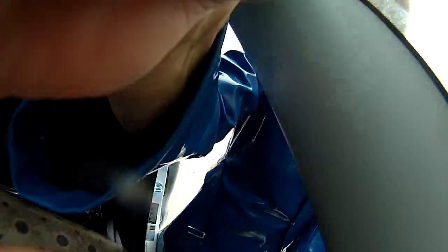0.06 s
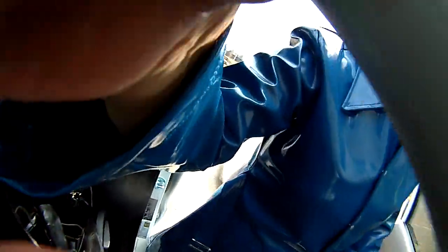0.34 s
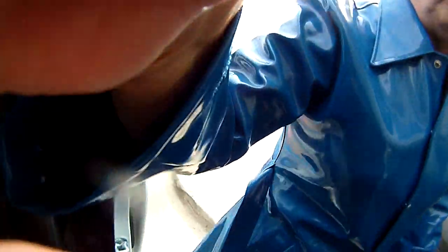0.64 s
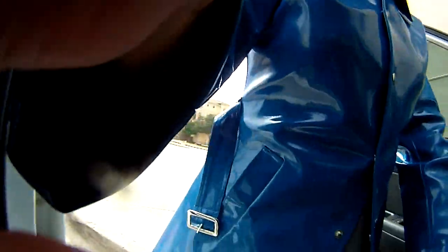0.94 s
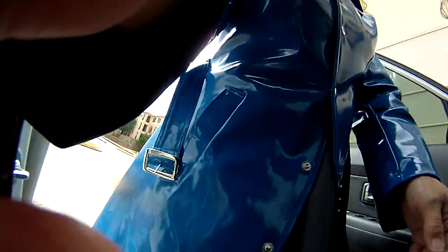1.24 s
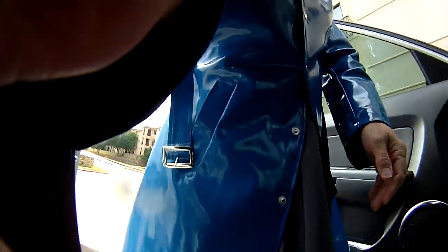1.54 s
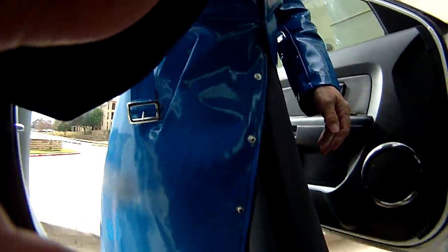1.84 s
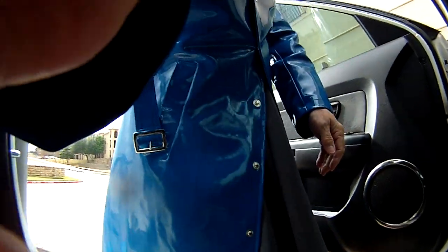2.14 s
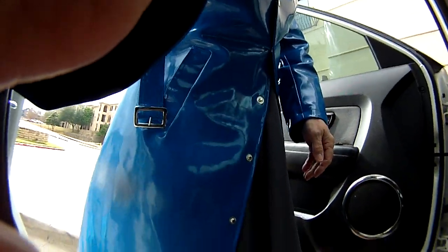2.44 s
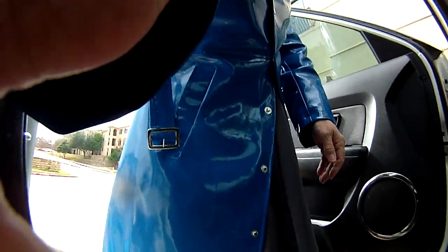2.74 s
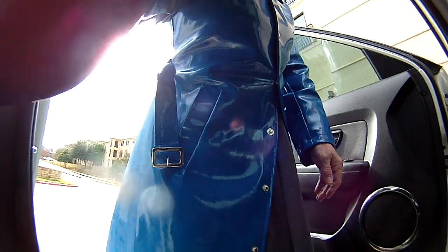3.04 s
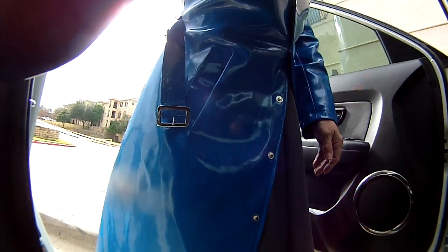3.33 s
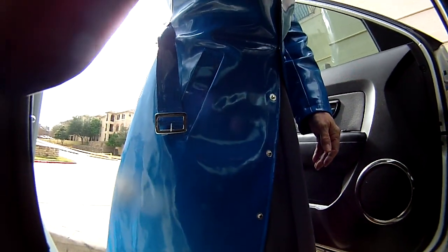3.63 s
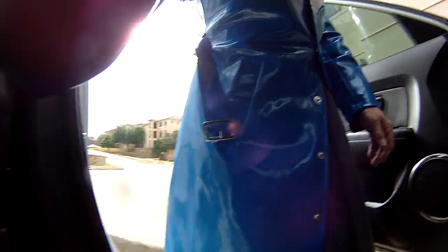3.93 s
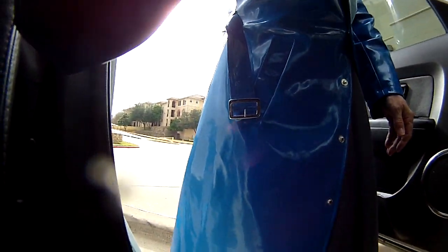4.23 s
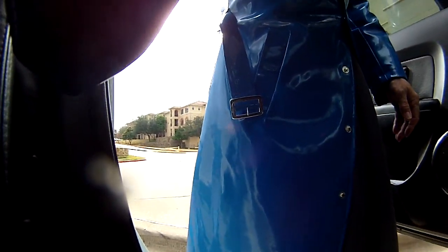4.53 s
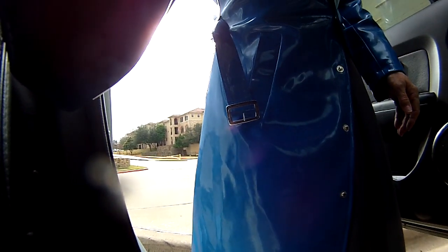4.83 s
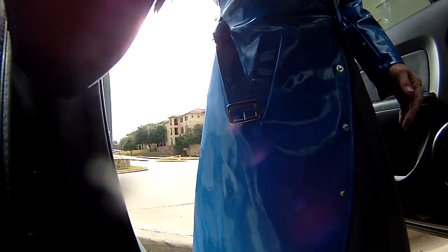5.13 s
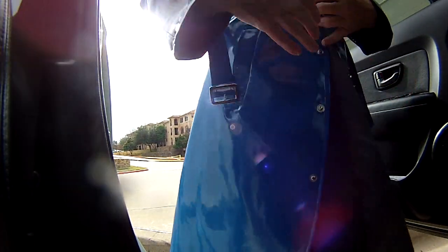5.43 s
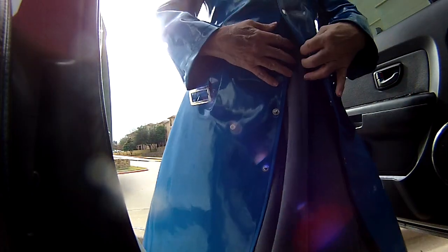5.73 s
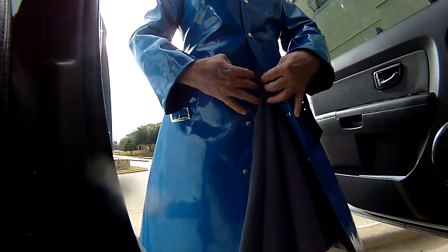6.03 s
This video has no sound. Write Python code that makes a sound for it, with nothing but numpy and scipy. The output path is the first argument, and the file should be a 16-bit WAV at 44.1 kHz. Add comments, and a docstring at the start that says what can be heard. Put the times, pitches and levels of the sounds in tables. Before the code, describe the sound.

A low rumble of distant traffic runs throughout, outdoors. From about 0.2 to 1.3 seconds a glossy plastic coat crinkles softly, with an uneven run of tiny snaps as the arms move. From 1.6 to 4.9 seconds a hand shifts its grip on the camera, right at the microphone. Skin slides over the plastic casing in many short strokes, some light and hissy, some firm and hollow, over a low handling rumble. Sharp ticks and dull knocks break through, with strong clicks near 2.8, 3.1, 3.9 and 4.0 seconds. The loudest event is a hard fingertip thump at about 3.3 seconds. A tiny skin squeak comes near 4.1 seconds and a deep bump at 4.5. From 5.2 seconds to the end, around 6, the coat crinkles again, while a low engine drone, growing since about 4 seconds, sits beneath it.

```python
"""Hand on a camera, glossy coat

A hand shifts its grip on a camera, right at the microphone. Skin sticks and slips on the plastic
casing, which ticks, thumps and rocks under the fingers. Before and after, a glossy PVC coat
crinkles as the arms move: its film clings to itself and lets go in tiny snaps.
Distant traffic rumbles under it all, and an engine drone grows towards the end."""
import sys
import numpy as np
from scipy import signal
from scipy.fft import rfft, irfft
from scipy.io import wavfile

SR = 44100
rng = np.random.default_rng(int(sys.argv[2]) if len(sys.argv) > 2 else 0)


def master(y):
    """Save y as 16-bit WAV."""
    cut = np.clip(np.atleast_2d(y).T, -1, 1)
    pcm = np.round(cut * 32767)  # scale
    wavfile.write(sys.argv[1], SR, pcm.astype(np.int16))


N = 267863
TIME = np.arange(N) / SR


# finger strokes on the casing: start_s, end_s, level_db, pressure (0 light to 1 firm)
FINGER_STROKES = [(1.593, 1.754, -45.5, 0.22), (1.781, 1.848, -57.5, 0.54), (1.908, 1.968, -57, .25),
                  (1.971, 2.029, -39.5, 0.4), (2.085, 2.154, -47.5, 0.58), (2.233, 2.287, -42.5, 0.2),
                  (2.294, 2.423, -44, 0.14), (2.428, 2.511, -52, 0.2), (2.616, 2.668, -41, 0.52),
                  (2.732, 2.844, -45.5, 0.33), (2.872, 2.97, -39.5, .17), (3.033, 3.183, -43.5, .15),
                  (3.32, 3.428, -47.5, 0.58), (3.472, 3.55, -50.5, 0.84), (3.611, 3.702, -47, 0.53),
                  (3.769, 3.879, -49, 0.19), (3.903, 3.953, -45, .17), (3.982, 4.058, -49, 0.55),
                  (4.099, 4.22, -53, 0.74), (4.287, 4.332, -46.5, 0.56), (4.408, 4.47, -50, 1),
                  (4.527, 4.566, -48, 0.68), (4.603, 4.69, -48, 0.26), (4.708, 4.79, -48, 0.2),
                  (4.795, 4.864, -62.5, 0.3)]
def finger_effort(edge_s=0.007, arch_db=4.5, graze_db=-15, graze_before_s=0.064, graze_after_s=0.092):
    """Power of light sliding and of pressed dragging; pressure turns the one into the other."""
    effort = np.zeros((2, N))
    for start, end, db, pressure in FINGER_STROKES:
        near = slice(int((start - .3) * SR), int((end + .3) * SR))
        t = TIME[near]
        # the finger grazes, lands, is fastest in mid-stroke, lifts and grazes again
        contact = (np.tanh((t - start) / edge_s) - np.tanh((t - end) / edge_s)) / 2
        speed = from_db(-arch_db * (2 * (t - start) / (end - start) - 1) ** 2)
        away = np.maximum(start - t, 0) / graze_before_s + np.maximum(t - end, 0) / graze_after_s
        graze = from_db(graze_db) * np.exp(-away)
        power = from_db(db) ** 2 * np.maximum(contact * speed ** 2, graze ** 2)
        pressed = np.sin(pressure * np.pi / 2) ** 2
        effort[:, near] += np.outer([1 - pressed, pressed], power)
    return effort


# bright hiss of a light slide: freq_hz, gain_db
SLIDE_EQ = [(400, -39), (1500, -17.5), (2900, -8), (3800, -1), (4700, 2), (5500, -5), (7400, -2.5),
            (8200, -6), (9000, -18), (12000, -41), (15000, -20.5)]
# midrange scrape of a firm drag: freq_hz, gain_db
DRAG_EQ = [(300, -16), (600, -1), (1000, 1.5), (1500, 3.5), (2150, 2), (2700, -2), (4000, -12),
           (8300, -19.5), (10100, -8.5), (11800, -33), (14000, -10.5), (16000, -25)]
# low rumble of the shaking grip: freq_hz, gain_db
GRIP_EQ = [(20, -1.5), (50, 4), (120, -2.5), (250, -8.5), (450, -11.5), (700, -14), (1100, -21.5),
           (2500, -28.5), (8000, -37)]
# hollow ring of the air pocket under a pressed finger: pitch_hz, width_hz, gain_db
POCKET_MODES = [(2005, 280, -1), (10160, 500, -10.5), (14200, 600, -16)]
def fingers(hollow_db=-2.5, grip_db=4.5, catch_db=-14, stick_db=2, lump_db=6, stroke_shake_db=-6.5):
    """Skin sticks and slips on the casing: bright when light, hollow when pressed, over a rumble."""
    light, firm = finger_effort()
    # every stroke shakes the grip a little, and a rocking camera shakes it more
    shaking = from_db(stroke_shake_db) ** 2 * (light + firm)
    for s, _, _, swell_s, rumble_db in CAMERA_ROCKS:
        add(shaking, s, (from_db(rumble_db) * swell(swell_s)) ** 2)
    stick_slip = rms_one(from_db(stick_db * drift(160)))
    sliding, dragging, gripping = np.sqrt([light, firm, shaking]) * stick_slip
    # pressed skin catches now and then and lets go with a tiny tick
    catches = from_db(catch_db) * dragging * grains(per_s=82, spread_db=0.5, hiss=0)
    slide = colour(sliding * grains(per_s=5000, spread_db=0, hiss=1) + catches, SLIDE_EQ)
    friction = grains(per_s=2500, spread_db=1.5, hiss=1)
    drag = colour(dragging * friction + catches, DRAG_EQ)
    # the air pocket sings more as pressing outweighs sliding
    pressed = firm / (light + firm + 1e-12)
    pocket = sum(from_db(db) * rms_one(ring(friction, hz, width)) for hz, width, db in POCKET_MODES)
    hollow = from_db(hollow_db) * dragging * pressed * rms_one(waver(pocket, share=.035, rate=56))
    lumps = rms_one(grains(per_s=980, spread_db=3, hiss=0.54) * from_db(lump_db * drift(60)))
    grip = colour(from_db(grip_db) * gripping * lumps, GRIP_EQ)
    return slide + drag + hollow + grip


# clear ticks, levels before their trims: start_s, ring_db, pitch_hz, body_db
CASING_TICKS = [(1.587, -32, 3760, -34.5), (1.616, -31.5, 4300, -25.5), (1.683, -44, 4400, -30.5),
                (1.729, -30, 4220, -32.5), (2.1852, -19.5, 3920, -26), (2.306, -17.5, 4630, -19),
                (2.441, -31, 4430, -27), (2.7691, -7.5, 4840, -21), (2.887, -15, 4300, -19),
                (2.919, -25, 4800, -29.5), (3.1263, -12.5, 4260, -22), (3.229, -18, 4850, -27),
                (3.2927, -31.5, 4470, -38), (3.3715, -29, 4740, -28), (3.692, -35, 4630, -26),
                (3.7611, -36, 4470, -20.5), (3.822, -30, 4350, -48), (3.8775, -7.5, 4880, -20),
                (3.9106, -18, 4360, -21), (3.977, -22, 4380, -27.5), (3.9817, -4.5, 4330, -21.5),
                (4.023, -16.5, 4300, -17), (4.1125, -26.5, 4640, -33), (4.1448, -28.5, 4470, -26),
                (4.5531, -31, 4500, -22.5), (4.672, -26.5, 4850, -29)]
# bright casing modes, the first retuned by each clear tick: pitch_hz, width_hz, gain_db
CASING_MODES = [(4870, 1480, 1.5), (7170, 800, -3.5), (14800, 1000, -25.5)]
# dull body of a tick: freq_hz, gain_db
TICK_BODY_EQ = [(60, -14.5), (300, -7), (700, 3), (1100, -5.5), (1900, -4.5), (2600, -8), (5000, -12),
                (9000, -15.5), (12000, -30.5), (15000, -19)]
def casing_ticks(ring_trim_db=8.5, body_trim_db=12.5, faint_ring_db=-39.5, faint_body_db=-37.5):
    """The plastic casing gives way under the fingers: a brief bright ring over a dull click."""
    out = np.zeros(N)
    sharp = burst(rise_s=0.00034, tail_db=-29, tail_s=0.0095)
    dull = burst(rise_s=0.00035, tail_db=-7.5, tail_s=0.0039)
    (first_hz, first_width_hz, first_db), *upper_modes = CASING_MODES
    # every stroke also sets off a faint tick somewhere along its way
    faint = [(rng.uniform(start, end), faint_ring_db, first_hz, faint_body_db)
             for start, end, *_ in FINGER_STROKES]
    for s, ring_db, pitch_hz, body_db in CASING_TICKS + faint:
        force = sharp * rng.standard_normal(len(sharp))
        for hz, width_hz, mode_db in [(pitch_hz, first_width_hz, first_db)] + upper_modes:
            mode = energy_one(ring(force, hz, width_hz))
            add(out, s, from_db(ring_trim_db + ring_db + mode_db) * mode)
        body = colour(dull * rng.standard_normal(len(dull)), TICK_BODY_EQ)
        add(out, s, from_db(body_trim_db + body_db) * energy_one(body))
    return out


# a fingertip presses and lets go: release_s, level_db, build_s
FINGERTIP_PRESSES = [(1.6158, -21, .0026), (1.652, -24, 0.0049), (2.389, -22.5, 0.0097),
                     (2.7966, -20.5, 0.0057), (2.8902, -21, 0.0029), (2.915, -19, .003), (3.2583, 2, 0.001),
                     (3.595, -21, 0.011), (3.708, -21, 0.0032), (3.82, -12, 0.0071), (4.024, -16.5, 0.0017),
                     (4.165, -17.5, 0.0036), (4.536, -15, 0.00069)]
# hollow knock of the camera shell: pitch_hz, width_hz, gain_db
SHELL_MODES = [(623, 300, 0.5), (1350, 110, -7), (1810, 310, -3.5), (3920, 2300, -24.5), (10500, 930, -24),
               (13800, 1700, -34.5)]
def fingertip_thumps(leak_hz=57, knock_db=-0.5, chatter=0.54, uneven_db=2, usual_build_s=.003):
    """Air pressure builds under a fingertip, collapses at once and leaks away; the shell knocks."""
    out, lead = np.zeros(N), SR // 25
    rattle = burst(rise_s=.001, tail_db=-16, tail_s=.008)
    for s, db, build_s in FINGERTIP_PRESSES:
        pressure = np.concatenate([-np.exp(-TIME[:lead][::-1] / build_s), np.zeros(2 * lead)])
        release_hz = 480 * (usual_build_s / build_s) ** 0.57  # a quicker press lets go more sharply
        add(out, s - lead / SR, from_db(db) * cut(pressure, release_hz, "low"))
        force = signal.unit_impulse(lead) + chatter * rattle * rng.standard_normal(lead)
        knock = sum(from_db(mode_db + uneven_db * rng.standard_normal()) * resonate(force, hz, width)
                    for hz, width, mode_db in SHELL_MODES)
        add(out, s, from_db(knock_db + db) * energy_one(knock))
    return cut(out, leak_hz, "high")


# sub-bass wobbles: start_s, level_db, pitch_hz, swell_s, rumble_db (played by fingers)
CAMERA_ROCKS = [(1.593, -32.5, 29.2, 0.032, -39), (2.361, -34, 29.5, 0.037, -47),
                (2.609, -38, 38.8, 0.036, -40.5), (3.6, -50, 40.8, 0.059, -46.5),
                (4.127, -24.5, 39, 0.027, -42.5), (4.281, -32, 35, 0.021, -42.5),
                (4.533, -19.5, 65.6, 0.017, -37)]
def camera_rocking():
    """The camera rocks in the hand for a few slow cycles."""
    return tone_pulses(CAMERA_ROCKS)


# soft, round taps: start_s, level_db, pitch_hz, swell_s
PAD_TAPS = [(1.6134, -29.5, 453, 0.0017), (2.3045, -23, 650, 0.0016), (2.915, -33, 614, 0.0021),
            (4.1535, -31.5, 650, 0.0026)]
def shell_taps():
    """A finger pad taps the hollow shell, which gives a short midrange note."""
    return tone_pulses(PAD_TAPS)


# tiny high blips: start_s, level_db, pitch_hz, swell_s
SKIN_SQUEAKS = [(4.1165, -37, 2250, .0014), (4.1293, -29, 1900, 0.001), (4.185, -50, 2050, .002)]
def skin_squeaks():
    """Pressed skin squeaks on the casing for a few milliseconds."""
    return tone_pulses(SKIN_SQUEAKS)


# how hard the arms work the coat, one curve a movement: time_s, effort_db
ARM_MOVES = [
    [(0.17, -78), (0.32, -70), (0.43, -62), (0.64, -68.5), (0.72, -64), (0.79, -68), (0.84, -54),
     (0.93, -61.5), (1.03, -61), (1.11, -68), (1.29, -65), (1.35, -78)],
    [(5.18, -76.5), (5.39, -72), (5.47, -63.5), (5.61, -60), (5.67, -67), (5.77, -64), (5.85, -64.5),
     (5.91, -72), (6.07, -73.5)],
]
# single folds snap over, levels before their trim: start_s, level_db
FOLD_SNAPS = [(0.217, -47), (0.4584, -40.5), (0.5285, -33.5), (0.69, -39.5), (0.826, -34), (0.9078, -35.5),
              (1.142, -31), (5.218, -45), (5.255, -40.5), (5.933, -40)]
# crinkly tone of the film: freq_hz, gain_db
CREASE_EQ = [(200, -6), (700, 3.5), (1400, 2.5), (2000, 0.5), (2900, 7), (3700, 0.5), (4650, 3.5),
             (5500, -8), (7400, 0), (9300, -5), (12000, -24.5), (15000, -10)]
def coat(fold_trim_db=11.5, usual_effort_db=-66, slips_per_s=70, slip_db=-38.5, rub_db=-65.5,
         uneven_db=4, jitter=0.23, taut_db=-8):
    """Glossy film sticks to itself and lets go in a quick uneven run of snaps, over a fine crackle."""
    force, tension = np.zeros((2, N))
    crackle = grains(per_s=900, spread_db=4.5, hiss=1)
    scatter_db = uneven_db * rng.standard_normal(N)
    releases = [(s, fold_trim_db + db) for s, db in FOLD_SNAPS]
    for move in ARM_MOVES:
        effort_db = np.interp(TIME, *np.transpose(move), left=-120, right=-120) - usual_effort_db
        # more effort gives more and bigger slips; their rate doubles every 20 dB
        slip_rate = slips_per_s * 2 ** (effort_db / 20) * np.exp(jitter * drift(80))
        size_db = slip_db + 0.86 * effort_db + scatter_db
        # a slip comes each time the film has been pulled one step further
        travel = np.cumsum(slip_rate) / SR
        steps = np.flatnonzero(np.diff(np.floor(travel)))
        releases += zip(TIME[steps], size_db[steps])
        tension += from_db(effort_db)
    snap = burst(rise_s=.0003, tail_db=-20, tail_s=.003)
    for s, db in releases:
        add(force, s, from_db(db) * snap)
    rubbing = from_db(rub_db) * tension * crackle
    crinkle = colour(force * rng.standard_normal(N) + rubbing, CREASE_EQ)
    # pulled taut, the film rings brighter
    return crinkle + from_db(taut_db) * tension * resonate(crinkle, hz=4900, width_hz=2100)


# fader moves of the street bed: time_s, rumble_db, drone_db
STREET_LEVELS = [(0, -47.5, -74), (1.0, -47, -62), (1.4, -47.5, -65), (4.5, -48, -50.5), (5.0, -48.5, -53),
                 (5.5, -49, -47), (6.07, -48.5, -56.5)]
# bass-heavy tone of far traffic: freq_hz, gain_db
TRAFFIC_EQ = [(20, -4), (45, 4), (80, -1), (115, -4.5), (170, -1.5), (300, -12.5), (600, -18.5),
              (1200, -21), (2200, -29.5), (4500, -37), (8000, -41), (15000, -42.5)]
def street(waver_db=1, drone_hz=80, drone_width_hz=22):
    """Distant traffic, with the low drone of an engine growing late."""
    s, rumble_db, drone_db = np.transpose(STREET_LEVELS)
    rumble = from_db(waver_db * drift(9)) * colour(rng.standard_normal(N), TRAFFIC_EQ)
    rumble *= from_db(np.interp(TIME, s, rumble_db))
    drone = rms_one(ring(rng.standard_normal(N), drone_hz, drone_width_hz))
    drone *= from_db(np.interp(TIME, s, drone_db))
    return rumble + drone


def grains(per_s, spread_db, hiss):
    """Tiny slips of uneven size over a share of smooth friction noise."""
    sizes = from_db(spread_db * np.minimum(rng.exponential(1, N), 4)) * rng.choice([-1, 1], N)
    slips = rms_one(sizes * (rng.random(N) < per_s / SR))
    return rms_one(slips + hiss * rng.standard_normal(N))


def burst(rise_s, tail_db, tail_s):
    """Envelope of a sudden slip, with unit energy: a very short peak, then a quieter tail."""
    t = TIME[:SR // 25]
    return energy_one(t / rise_s * np.exp(1 - t / rise_s) + from_db(tail_db) * np.exp(-t / tail_s))


def swell(swell_s):
    """Envelope that peaks at 1 after swell_s and dies away."""
    t = TIME[:SR // 4]
    return (t / swell_s * np.exp(1 - t / swell_s)) ** 2


def tone_pulses(rows):
    """For each row, a few sine cycles that swell and die."""
    out = np.zeros(N)
    for s, db, hz, swell_s, *_ in rows:
        shape = swell(swell_s)
        add(out, s, from_db(db) * shape * np.sin(2 * np.pi * hz * TIME[:len(shape)]))
    return out


def drift(rate):
    """Random curve with spread 1 and about `rate` turns a second."""
    knots = rng.standard_normal(N // 20)
    return rms_one(np.interp(TIME * rate, np.arange(len(knots)), knots))


def waver(x, share, rate):
    """Read a sound at a wandering speed, so that its pitch wavers."""
    samples = np.arange(N)
    return np.interp((samples + np.cumsum(share * drift(rate))) % N, samples, x)


def colour(x, eq, size=8192):
    """Minimum-phase filter with the shape of the EQ curve and unit energy."""
    hz, db = np.transpose(eq)
    log_hz = np.log(np.fft.rfftfreq(size, 1 / SR) + 1)
    gain = rms_one(from_db(np.interp(log_hz, np.log(hz), db)))
    cepstrum = irfft(np.log(gain))
    cepstrum[1:size // 2] *= 2
    cepstrum[size // 2 + 1:] = 0
    return signal.oaconvolve(x, irfft(np.exp(rfft(cepstrum))))[:len(x)]


def resonate(x, hz, width_hz):
    """Two-pole resonance with gain 1 at its peak."""
    r = np.exp(-np.pi * width_hz / SR)
    feedback = [1, -2 * r * np.cos(2 * np.pi * hz / SR), r * r]
    return signal.lfilter(np.array([1, 0, -1]) * (1 - r * r) / 2, feedback, x)


def ring(x, hz, width_hz):
    """The same resonance twice, for steeper skirts."""
    return resonate(resonate(x, hz, width_hz), hz, width_hz)


def cut(x, hz, kind):
    """Second-order Butterworth low- or high-pass."""
    return signal.sosfilt(signal.butter(2, hz, kind, fs=SR, output="sos"), x)


def add(out, s, sound):
    """Mix a sound in at time s."""
    start = int(round(s * SR))
    out[start:start + len(sound)] += sound[:N - start]


def from_db(db):
    """Decibels to gain."""
    return 10 ** (np.asarray(db) / 20)


def rms_one(x):
    """Scale to unit power."""
    return x / np.sqrt(np.mean(x ** 2) + 1e-20)


def energy_one(x):
    """Scale to unit energy."""
    return x / np.linalg.norm(x)


def scene():
    """The street and the coat, with the hand close by, in mono."""
    surroundings = street() + coat()
    hand = fingers() + casing_ticks() + fingertip_thumps()
    hand += camera_rocking() + shell_taps() + skin_squeaks()
    return (surroundings + hand)[None]


def record(dry):
    """The microphone port notches out a narrow band; a steep low-pass cuts the top."""
    notch_share, cutoff_hz = 0.77, 15450
    ported = dry - notch_share * resonate(dry, hz=5996, width_hz=1030)
    return signal.sosfilt(signal.ellip(10, .1, 70, cutoff_hz, fs=SR, output="sos"), ported)


dry = scene()
out = record(dry)
master(out)
```